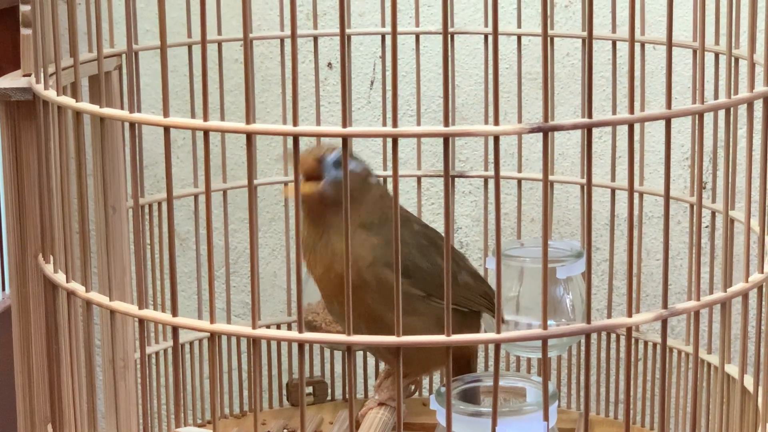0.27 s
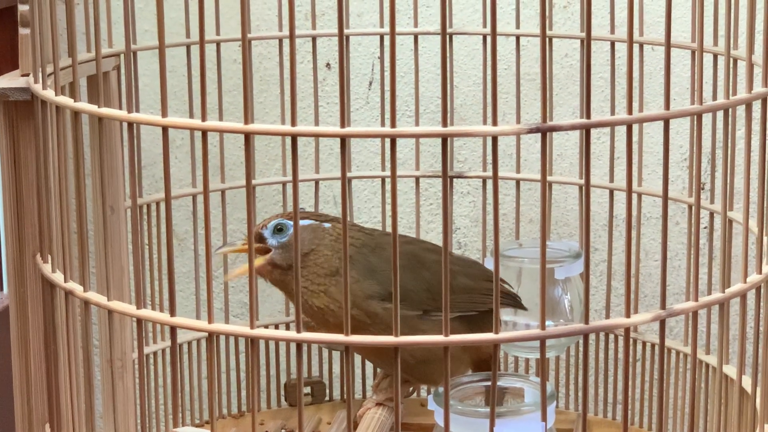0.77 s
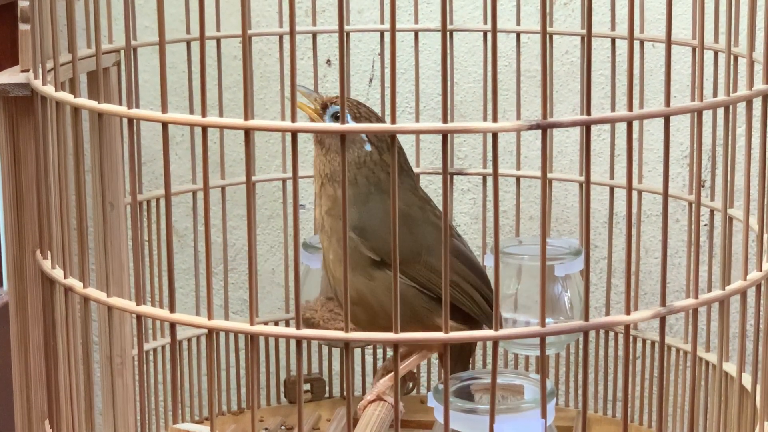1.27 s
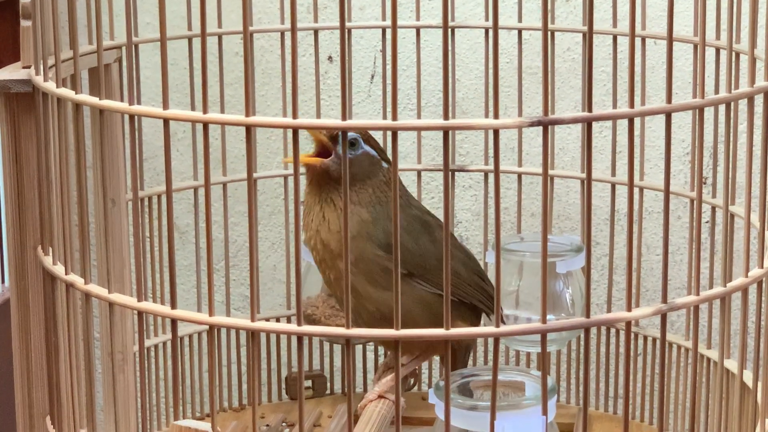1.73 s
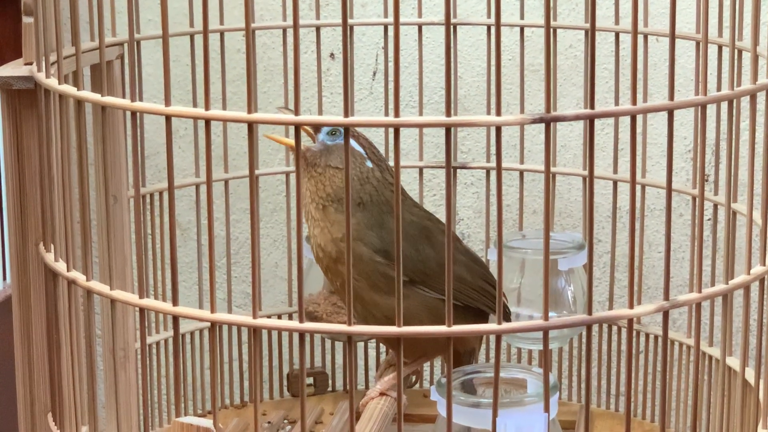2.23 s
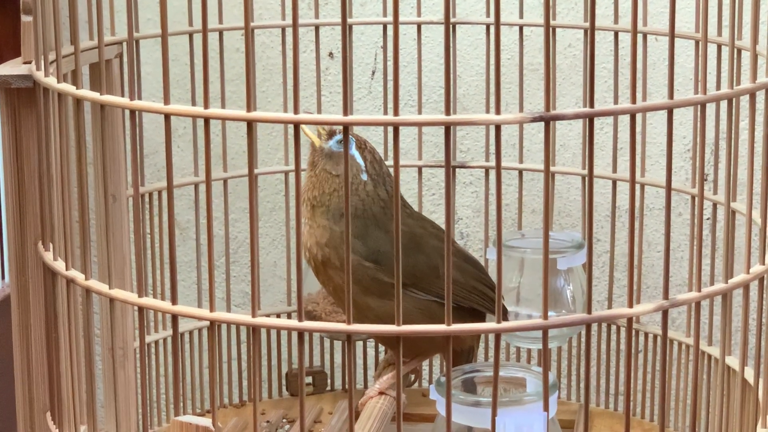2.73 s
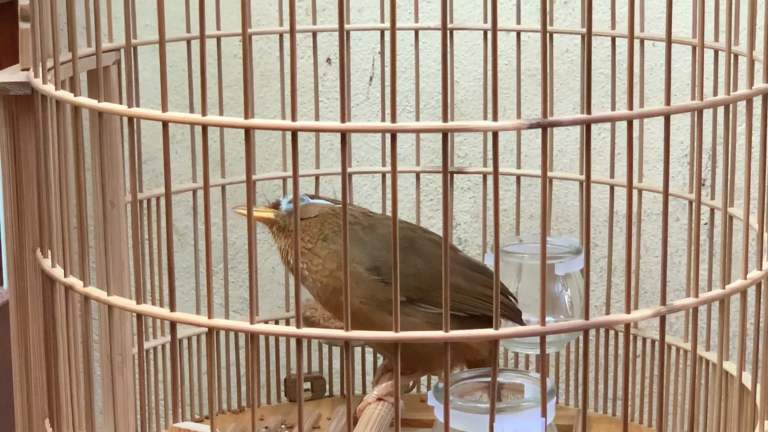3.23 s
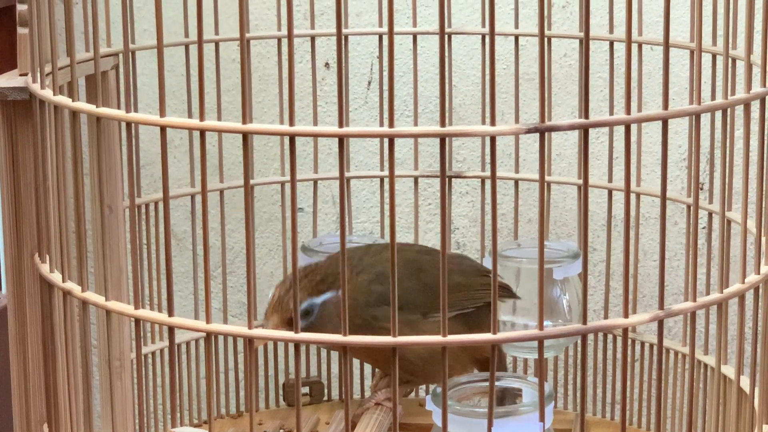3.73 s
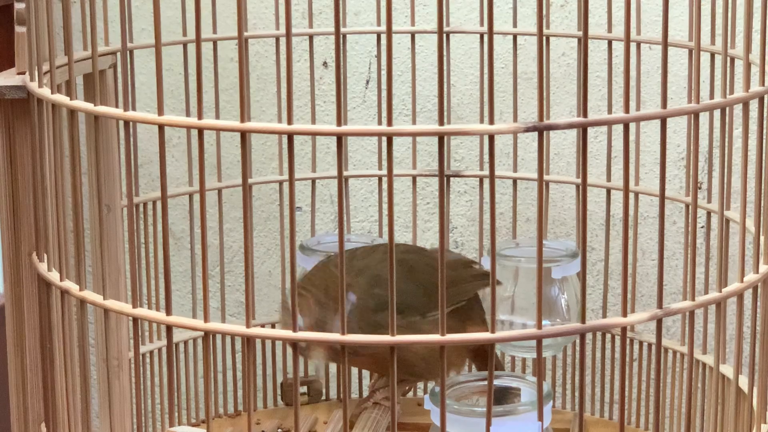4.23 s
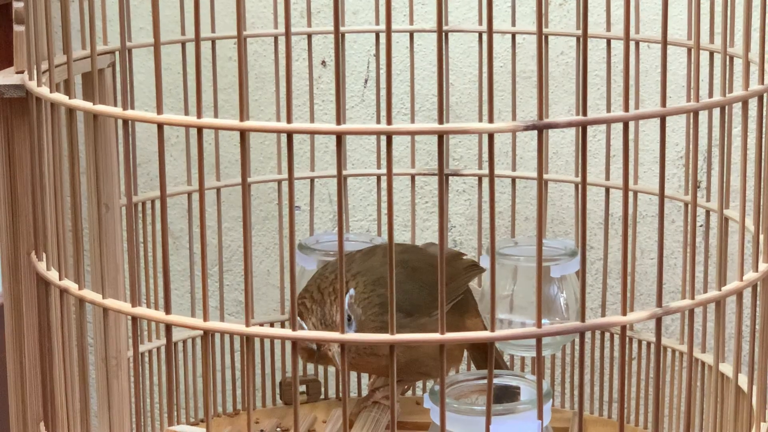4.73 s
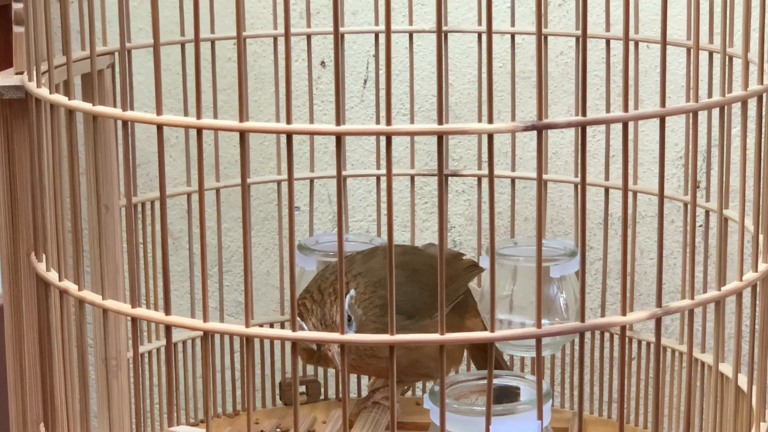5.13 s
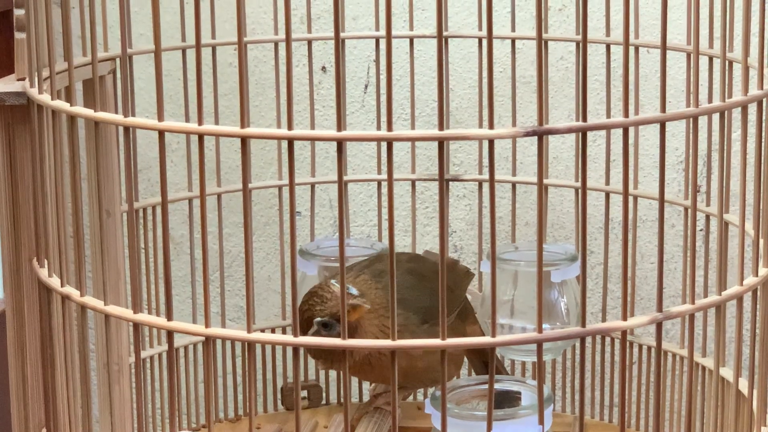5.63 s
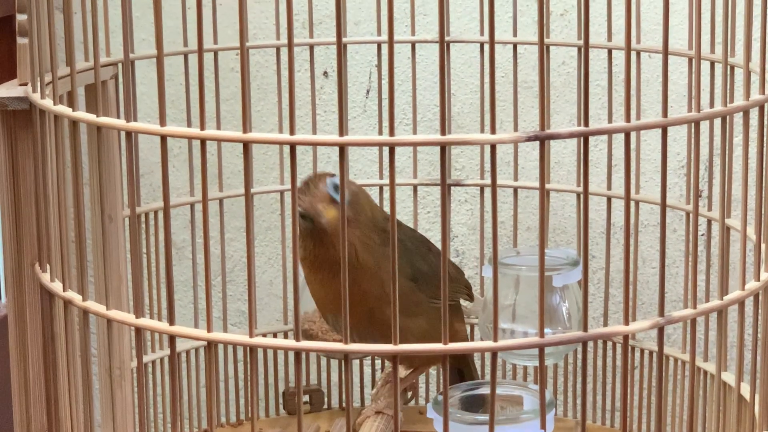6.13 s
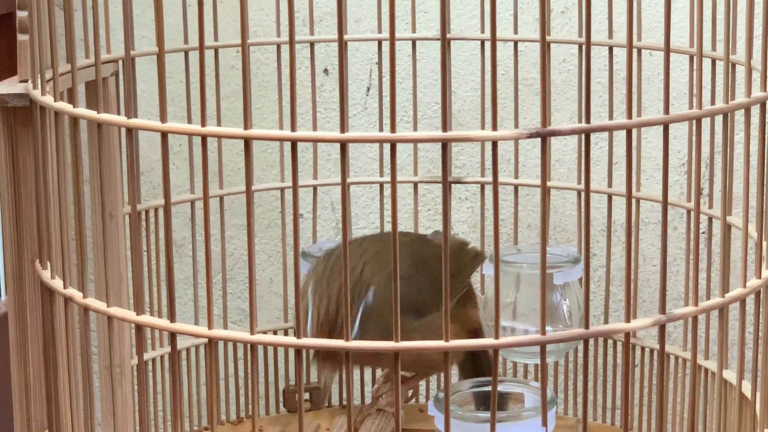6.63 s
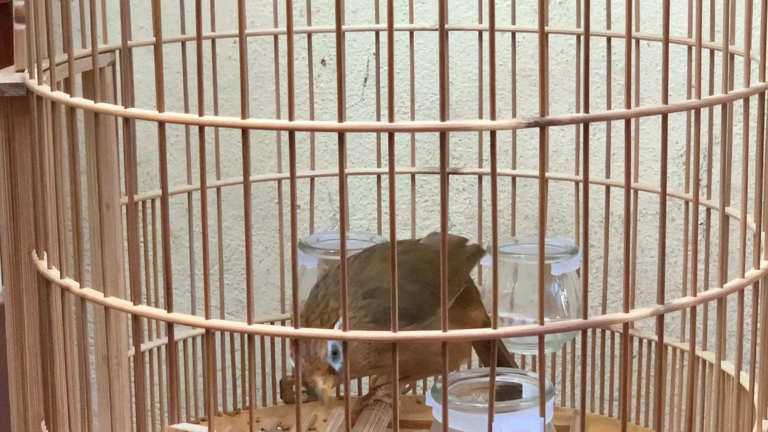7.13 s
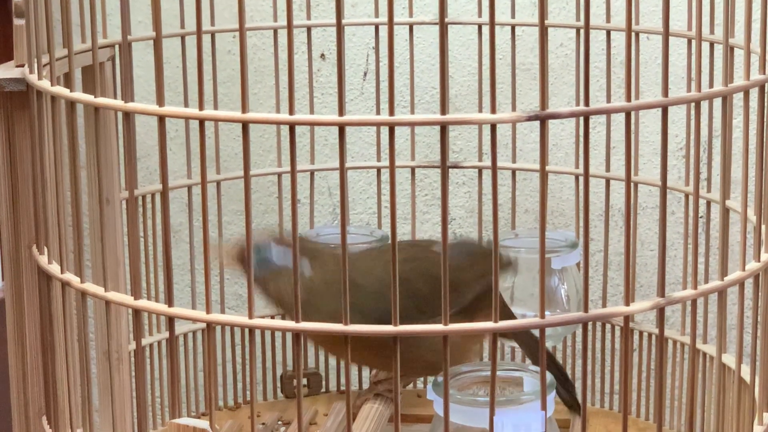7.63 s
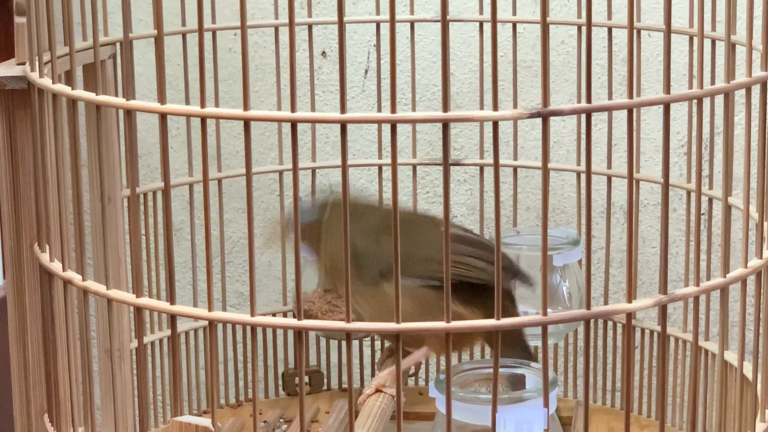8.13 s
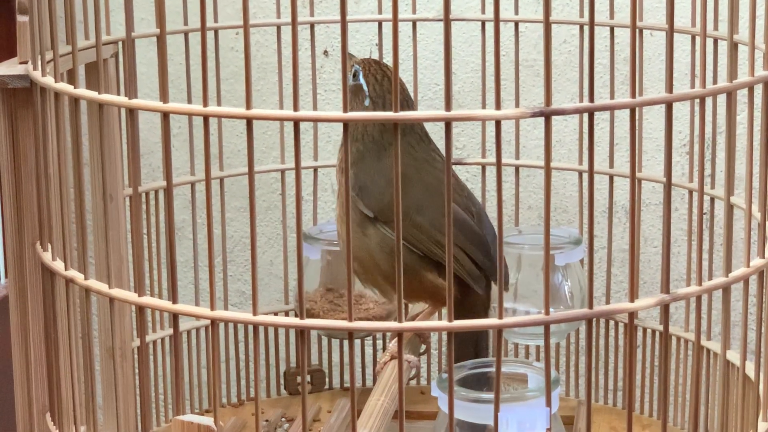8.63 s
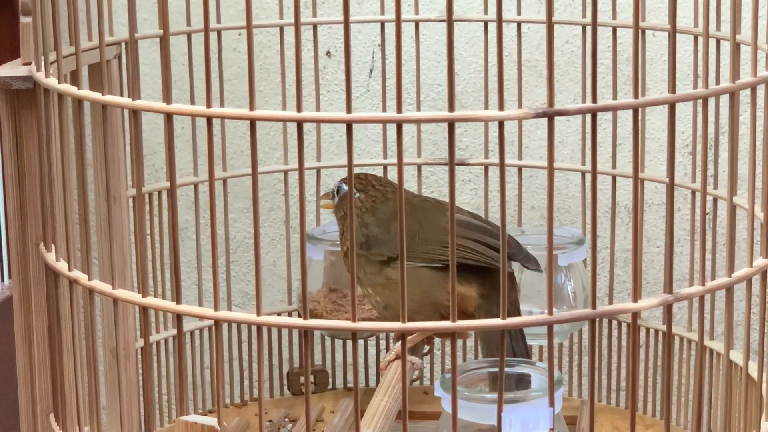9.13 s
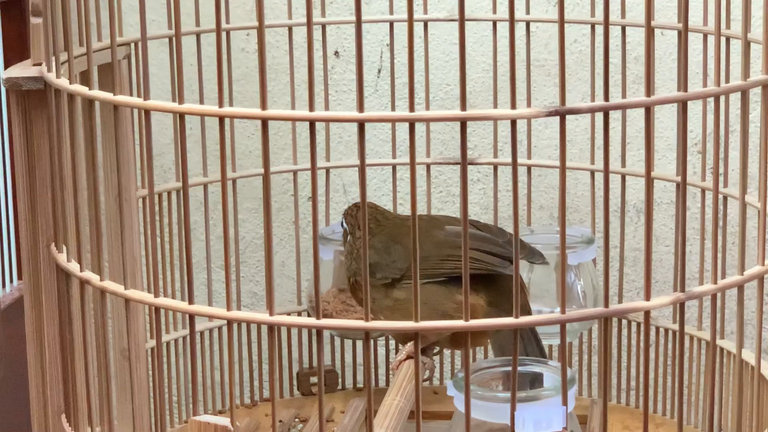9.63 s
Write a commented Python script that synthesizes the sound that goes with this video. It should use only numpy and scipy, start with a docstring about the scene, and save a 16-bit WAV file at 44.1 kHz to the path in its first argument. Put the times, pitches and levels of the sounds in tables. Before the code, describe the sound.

Loud, bright whistled notes leap between low and high pitches near the microphone, then stop. Faint, hoarse and gliding calls fill the gap before a mellow, lower bird swells upward and repeats brisk downward notes from the right. After a quiet lull, the near bird churrs gently while its bamboo cage clicks and knocks. Distant rasps close the scene, with steady low humming, soft hiss and short room reverberation beneath.

```python
"""A caged songbird whistles a phrase close by and later churrs: near sines, burred by a fluttering membrane.
A deeper-voiced bird, louder on the right, answers with one rising call and a run of falling notes.
Further off, gliding sines and pulse trains make whistles, chips and rasps; randomly wandering carriers make
hoarse calls and a faint insect-like hiss; noise pulses rattle late on. Now and then a blow rings the bamboo.
Behind lie a blurred chorus of random glides, a bright hiss in puffs and a hum of wandering tones with rumble."""
import sys
import numpy as np
from scipy import signal
from scipy.fft import rfft, irfft, next_fast_len
from scipy.io import wavfile
from scipy.ndimage import uniform_filter1d

SR = 44100
rng = np.random.default_rng(int(sys.argv[2]) if len(sys.argv) > 2 else 0)


def dump_mix(stems):
    """Bounce the given channels to the path in sys.argv[1] as a 16-bit WAV at rate SR."""
    frames = np.atleast_2d(stems).T  # one column per channel
    limited = np.clip(frames, -1, 1)  # hard clip at full scale
    pcm = np.round(limited * 32767).astype(np.int16)
    wavfile.write(sys.argv[1], SR, pcm)


N = 436149

# Whistled notes glide once between pitches; haste > 0 glides early and settles, < 0 holds and glides late.
# near bird's song: (start [s], length [s], from [Hz], to [Hz], haste, peak [dB], place of the peak [0-1],
# swell [dB], burr [0-1])
SONG_NOTES = [(0.116, 0.1079, 2581, 1935, 2.36, -19.5, 0.32, 5, 0.82),
              (0.228, .03, 2093, 2998, 2.11, -15, 0.89, 11, 1),
              (0.316, 0.0256, 3794, 3783, -0.27, -9.5, 0.7, 6.5, 0.4),
              (0.344, 0.0441, 3483, 2768, 0.83, -18, 0.47, 2, 0.81),
              (0.394, 0.0823, 2403, 2031, 1.46, -22, 0.67, 2, 0.85),
              (0.625, .055, 1990, 2150, .8, -29, .4, 4, .5),
              (0.695, 0.04, 2230, 2260, 1.1, -19.5, 0.45, 5, 0.5),
              (.745, .035, 2250, 2100, -.5, -28, .2, 4, .6),
              (0.791, 0.1087, 1933, 3039, 2.08, -17, 0.86, 11, 0.52),
              (0.98, 0.118, 4480, 3140, 2.3, -14.5, .86, 11, 0.49),
              (1.153, 0.025, 4150, 4600, 1.3, -24.5, 0.52, 4, 0.5),
              (1.193, 0.043, 3868, 3919, .8, -10.5, 0.5, 12, 0.16),
              (1.301, 0.0884, 2069, 2297, 0.37, -19, 0.84, 15, 0.17),
              (1.421, 0.0276, 2333, 2270, 0.86, -19, 0.49, 14, 0.51),
              (1.49, .048, 1930, 2700, 0.3, -23.5, 0.5, 5.5, 0.66),
              (1.548, 0.078, 2900, 3035, 1.2, -14.5, 0.4, 3, 0.12),
              (1.715, 0.026, 4240, 4473, 1.06, -28, 0.31, 2.5, 0.6),
              (1.742, 0.055, 3750, 3690, .8, -22, .85, 4, 0.38),
              (1.812, .03, 3870, 3950, 1.2, -19, .3, 5, .4),
              (1.917, .175, 1918, 2229, 2.01, -20.5, 0.88, 6, 0.25),
              (2.184, 0.075, 1920, 2720, .7, -23, 0.8, 5, 0.45),
              (2.268, .1, 2760, 3000, -.8, -20, .8, 4, .45),
              (2.437, 0.05, 3600, 3760, 2.2, -26, .6, 5, 0.4),
              (2.507, .04, 3790, 3870, 1.5, -17.5, .25, 6, .4),
              (2.67, 0.045, 1920, 2160, 1.5, -28, .6, 3, 0.47),
              (2.73, .125, 2150, 2290, -1.6, -22, .55, 4, .35),
              (2.864, 0.028, 2450, 3420, -.6, -19, 0.61, 10.5, 0.86)]
# near bird's churrs: (start [s], length [s], top [Hz], end [Hz], peak [dB])
CHURR_NOTES = [(8.363, 0.172, 2270, 2285, -23), (8.679, 0.165, 2300, 2275, -22.5),
               (9.023, 0.162, 2235, 2195, -23), (9.332, 0.085, 2335, 2250, -24)]
# near bird in stereo: (frequency [Hz], left over right [dB], left lead [rad])
NEAR_STEREO = [(1915, -0.5, 0.42), (2280, -3.5, 0.897), (2935, -2.5, 1.09), (3738, -1, 1.926),
               (4436, -1.5, 1.7), (6480, -1, 2.488), (8125, -1.7, 1.156), (9000, -4, 2.04),
               (10560, 0.5, 2.0), (14000, -1.5, 1.38)]
# near bird's overtones, with faint lines between the whole multiples: (multiple, level [dB])
SONG_OVERTONES = [(2, -25.5), (3, -29), (3.5, -40), (4, -37), (6, -38), (6.5, -38)]
# beak colour on the overtones: (frequency [Hz], gain [dB])
BEAK_COLOUR = [(4000, -3), (6000, -2), (8000, 1), (11000, 3), (12200, -3), (13500, 3), (14500, 1),
               (16000, 5)]
# spectrum of the air through the near bird's beak: (frequency [Hz], density [dB per Hz])
BREATH_SPECTRUM = [(4400, -20), (6000, -12), (8000, -8), (10500, -5), (11900, -16), (13500, 0), (14600, -8),
                   (15800, -14)]
# deep-voiced bird: (start [s], length [s], from [Hz], to [Hz], haste, peak [dB], place of the peak [0-1])
ANSWER_NOTES = [(4.571, 0.5133, 1590, 1951, -1.9, -25.5, .94),
                (5.224, 0.0503, 1623, 1385, 1.09, -14.5, 0.29), (5.382, 0.0503, 1527, 1214, 1.06, -9, 0.37),
                (5.532, 0.0477, 1400, 1095, 0.94, -14, 0.29), (5.683, 0.0398, 1372, 1058, 0.89, -12, 0.38),
                (5.832, 0.0259, 1319, 1048, 0.44, -17, 0.68), (5.98, 0.0368, 1404, 1044, 0.53, -13, 0.42),
                (6.148, 0.0293, 1302, 995, 0.52, -21.5, 0.48), (6.308, 0.0323, 1295, 995.4, 0.57, -18, 0.5),
                (6.474, 0.0395, 1401, 1038, -0.16, -15, 0.59), (6.658, 0.024, 1316, 1040, -0.28, -19, .4),
                (6.803, 0.0737, 1392, 1025, -1.035, -13, 0.63), (7.027, .05, 1273, 980.3, 1.13, -18, 0.25),
                (7.22, 0.101, 1283, 1022, 1.67, -17, 0.31), (7.487, 0.325, 1275, 975, 1.9, -17.5, 0.14)]
# whistles further off: (start [s], length [s], from [Hz], to [Hz], haste, peak [dB], place of the peak [0-1])
FAR_NOTES = [(.02, 0.098, 2520, 2557, 0.13, -34, 0.86), (0.151, 0.117, 3436, 2777, 1.5, -33.5, 0.34),
             (0.541, 0.1284, 2954, 3096, 1.27, -34.5, 0.6), (.74, 0.083, 2837, 2927, 0.56, -32, 0.123),
             (.93, 0.062, 2346, 2370, 1.53, -30.5, .5), (1.02, 0.2025, 2024, 2244, -0.89, -37, 0.69),
             (1.23, 0.142, 3660, 3183, 2.23, -35, 0.253), (1.41, 0.11, 2840, 2790, .8, -32, 0.4),
             (1.55, .13, 2600, 2720, .8, -37, .6), (1.705, .05, 2090, 2240, 1.8, -36, .6),
             (1.72, .15, 2760, 2650, .6, -39, .5), (2.44, 0.06, 2950, 2178, -1.5, -39, 0.3),
             (2.905, .08, 2600, 2700, 1.5, -38, .8), (2.62, 0.183, 2468, 2369, 1.09, -32.5, 0.44),
             (3.0, .1, 2670, 2670, .5, -39, .3), (3.125, .03, 1820, 1820, .5, -45, .4),
             (3.275, 0.1415, 2345, 2390, -1.2, -28.5, 0.4), (3.42, 0.0299, 2450, 2905, 1, -39, .4),
             (3.5, .07, 3650, 2710, 2.6, -46, .8), (3.575, .085, 2690, 2650, .6, -30, .3),
             (3.7, .04, 2650, 2640, .6, -44, .3), (3.72, .03, 3510, 3500, .6, -40, .4),
             (3.96, 0.142, 1895, 2132, 0.2, -45, 0.81), (4.11, 0.172, 2147, 1752, -0.93, -43, 0.68),
             (4.07, .1, 2980, 2930, .6, -46, .15), (4.33, 0.14, 1790, 2200, -1.3, -45, .8),
             (4.46, .05, 2120, 2350, 1.2, -36, .75), (4.705, .1, 3130, 2520, 1.9, -41, .35),
             (4.82, .1, 2460, 1850, -.9, -36, .28), (5.06, .14, 1511, 1624, 1.84, -38.5, 0.574),
             (5.77, 0.0504, 1900, 1906, 0.12, -45.5, 0.44), (5.88, .05, 1906, 1898, -1.1, -44.5, 0.47),
             (5.99, 0.043, 1940, 1979, -1.5, -41.5, .4), (5.17, 0.24, 2100, 2130, 2.73, -39.5, 0.48),
             (5.34, .085, 3280, 2520, 1.3, -39, .4), (5.44, .07, 2450, 2200, .5, -40, .4),
             (5.53, .07, 2050, 1850, 1.5, -49, .4), (5.671, 0.089, 2792, 3250, 1.3, -41.5, 0.182),
             (5.885, 0.3, 4400, 2998, 2.5, -41, 0.71), (6.19, 0.1164, 2835, 3244, 0.05, -35.5, 0.51),
             (6.56, .21, 3550, 2980, 1.5, -40.5, .5), (6.954, 0.149, 3171, 3230, 0.8, -34.5, 0.094),
             (7.68, 0.057, 2016, 1895, 0.53, -47, 0.237), (7.786, 0.058, 1986, 1890, 0.9, -42.5, .2),
             (7.875, 0.035, 2036, 2000, 0.6, -44, .4), (7.93, .03, 2230, 2130, .8, -45, .6),
             (7.98, .04, 2250, 2150, .8, -47, .3), (8.03, .045, 1180, 1140, .6, -49, .6),
             (8.04, .035, 4600, 4560, .6, -55, .4), (8.06, .04, 2250, 2300, .6, -52, .5),
             (8.285, .025, 3060, 3040, .6, -50, .5), (7.43, .04, 1420, 1350, .6, -46, .7),
             (6.98, .03, 1400, 1380, .6, -40, .5), (6.7, .02, 5400, 4900, .8, -48, .4),
             (6.72, .11, 4750, 4620, 2.2, -52, .3), (6.95, .07, 4400, 4580, 1.5, -47, .3),
             (.075, .02, 9000, 6000, 1.2, -48, .5), (8.367, .02, 7500, 3700, 1.5, -53, .5),
             (8.508, .025, 7000, 3300, 1.5, -53, .5), (1.99, .012, 6200, 4700, .8, -54, .6),
             (2.09, .012, 6200, 4700, .8, -54, .6), (2.19, .012, 6200, 4700, .8, -54, .6),
             (2.29, .012, 6200, 4700, .8, -54, .6), (2.393, .012, 6200, 4700, .8, -56, .6),
             (8.14, 0.049, 2120, 2064, 0.44, -47.5, 0.38), (8.27, 0.058, 2098, 2030, 0.24, -50, 0.36)]
# harsh calls further off, with a fast burr:
# (start [s], length [s], from [Hz], to [Hz], haste, peak [dB], place of the peak [0-1])
HARSH_NOTES = [(3.05, .11, 3170, 2350, -2.2, -39, .75), (3.755, .05, 3300, 1850, .6, -39, .3),
               (6.8, .07, 2350, 2680, 2.9, -30, 0.35), (6.78, .07, 2020, 2080, .6, -38, .4),
               (6.875, .05, 2900, 3250, .8, -38, .6), (6.91, .09, 2100, 2750, .9, -38, .5),
               (7.075, .16, 2290, 2130, .6, -33, .4), (7.085, .13, 2620, 2380, 1.2, -36, .15),
               (9.4, .075, 2140, 1880, .5, -28, .2)]
# hoarse calls further off, and a faint insect-like hiss near 8 kHz:
# (start [s], length [s], centre from [Hz], centre to [Hz], level [dB])
WANDERING_CARRIERS = [(0.028, 0.1866, 1245, 1209, -47.5), (.6, 0.2176, 1297, 1257, -45.5),
                      (1.097, 0.165, 1294, 1287, -45), (2.226, 0.192, 1317, 1256, -50.5),
                      (2.95, .12, 4250, 4250, -53), (3.34, .05, 4200, 4150, -54),
                      (3.45, .06, 3950, 3800, -54), (3.62, .07, 3750, 3700, -53),
                      (3.73, .05, 4300, 3900, -53), (3.835, .12, 4150, 4250, -54),
                      (3.97, .12, 4050, 3950, -54), (4.06, .13, 2500, 2450, -50),
                      (4.23, 0.174, 1350, 1280, -44.5), (4.25, .09, 2350, 2300, -47),
                      (4.28, .06, 3950, 3900, -52), (4.375, .09, 4050, 4000, -53),
                      (4.27, .08, 8200, 8200, -66), (4.4, .07, 8200, 8200, -69),
                      (4.5, .06, 8200, 8200, -69), (4.6, .09, 8200, 8200, -68),
                      (4.74, .09, 8300, 8300, -68), (5.05, .28, 8100, 8100, -68),
                      (7.97, .05, 1500, 1400, -52), (7.44, .06, 3250, 3100, -49),
                      (4.473, 0.065, 4000, 4100, -49.5), (4.588, 0.084, 4400, 4420, -49),
                      (4.722, 0.0903, 4090, 4198, -44.5), (5.05, 0.0934, 4110, 3392, -47.5),
                      (5.1, 0.0965, 2636, 2237, -43), (6.147, 0.107, 4240, 3070, -44),
                      (6.497, 0.0894, 2510, 2647, -42.5), (6.735, 0.129, 1673, 2466, -42.5),
                      (6.41, .16, 4200, 3650, -44), (7.02, 0.1785, 4810, 3590, -48),
                      (6.97, .05, 4700, 5050, -50), (7.244, 0.1384, 3460, 3556, -50),
                      (9.439, 0.15, 2678, 3312, -43), (9.68, 0.246, 3194, 3055, -39)]
# thin chips of a small bird: (start [s], peak [dB], pitch just past the middle [Hz])
CHIP_CALLS = [(1.7909, -30, 4030), (1.8932, -54, 4580), (1.9983, -52, 4550), (2.0992, -53, 4606),
              (2.2, -54.5, 4504), (2.2969, -45.5, 4575), (2.4013, -50, 4590), (7.6815, -51.5, 4080),
              (7.785, -53, 4040), (7.798, -51, 6630), (7.869, -52, 4086), (7.925, -53, 4450),
              (8.2718, -46, 6600), (8.16, -55, 4300)]
# rasping calls with a moving throat resonance:
# (start [s], length [s], resonance from [Hz], resonance to [Hz], width [Hz], level [dB])
RASP_CALLS = [(9.4, .24, 4150, 3250, 280, -43), (9.43, .21, 2300, 3050, 330, -36),
              (9.68, .24, 3400, 2950, 310, -30.5), (9.63, .26, 1800, 2350, 240, -44)]
# two-voiced twitters of a small bird: (time [s], peak [dB])
TWITTER_CALLS = [(5.622, -49), (5.738, -46), (5.852, -47), (5.969, -46)]
# the twitter's two voices, a flick up and an arch: (time after the call [s], pitch [Hz], level [dB])
VOICES = [
    [(-.004, 5200, -16), (.008, 5680, -1), (.017, 5950, -10)],
    [(.006, 4300, -10), (.02, 4580, -1), (.032, 4620, 0), (.04, 4350, -8), (.052, 3650, -13)],
]
# resonances of the late rattle: (frequency [Hz], width [Hz], level [dB])
RATTLE_RESONANCES = [(3100, 300, -6), (5300, 350, 0), (6250, 350, -2), (7100, 400, 0), (8600, 900, -8),
                     (10500, 1200, -8)]
# blows on the bamboo: (time [s], body level [dB], tick level [dB])
KNOCK_BLOWS = [(3.309, -54, -40), (3.714, -77, -46.5), (4.007, -60, -46), (5.418, -34, -74.5),
               (6.424, -36, -45), (8.933, -19.5, -30), (9.369, -27.5, -27.5)]
# ringing modes of the bamboo: (frequency [Hz], level [dB], decay by 60 dB [s])
BAMBOO_MODES = [(1192.5, 3.5, 0.024), (800, -44.5, .02), (1750, -26.5, 0.0061)]
# background levels: (time [s], chorus [dB], chatter hiss [dB])
BED_LEVELS = [(0.0, -32, -52), (0.47, -37.5, -61), (0.82, -51.5, -69), (1.1, -37, -57), (1.54, -46, -69.5),
              (1.82, -38.5, -71), (2.23, -51, -67.5), (2.75, -39.5, -59.5), (3.14, -49, -71),
              (3.92, -50, -66), (4.3, -43, -64), (4.74, -50, -67), (7.05, -43, -65), (7.35, -51, -74),
              (7.7, -56, -74), (8.62, -53, -70), (8.78, -50, -59), (9.65, -42, -60), (9.89, -31, -51)]
# colour of the distant chorus: (frequency [Hz], density [dB per Hz])
CHORUS_SPECTRUM = [(880, -17.5), (1500, -17.5), (1700, -9), (2190, -2), (2860, -4.5), (3120, -10),
                   (5200, -14.5), (6760, -54), (11400, -120)]
# colour of the bright hiss: (frequency [Hz], density [dB per Hz])
CHATTER_SPECTRUM = [(2650, -34.5), (4500, -9), (5610, -7), (6890, -5), (9060, -7), (10500, -3),
                    (11800, -16), (12500, -11), (13900, -6), (15800, -24)]
# puffs of bright hiss, as of feathers or far chatter: (start [s], decay [s], level [dB])
HISS_PUFFS = [(3.3, .05, -59), (3.44, .05, -63), (3.62, .05, -61), (3.73, .04, -60), (3.84, .08, -60),
              (4.0, .05, -62), (4.27, .07, -56), (4.38, .05, -60), (4.49, .04, -61), (4.59, .07, -60),
              (4.74, .06, -60), (4.88, .05, -60), (5.16, .06, -56), (5.37, .05, -64), (5.51, .05, -59),
              (6.15, .04, -54), (6.36, .08, -55), (6.74, .12, -57), (6.96, .1, -60), (7.1, .1, -58),
              (7.57, .04, -61), (7.975, .04, -54), (8.37, .1, -60), (8.72, .12, -54), (9.4, .15, -56),
              (9.7, .2, -47)]
# hum level over time: (time [s], level [dB])
HUM_FADER = [(0.0, -39.5), (0.36, -37.5), (1.43, -39.5), (1.95, -46), (2.069, -40), (9.81, -36.5),
             (9.89, -35.5)]
# tones of the hum: (frequency [Hz], spread of the wander [Hz], level [dB])
HUM_TONES = [(47.7, 4.5, -11), (84.937, 4.51, 0.5), (114.65, 9.5, -7.5), (153.65, 4, -12.5),
             (260.4, 4, -30.5)]
# the room's rumble: (frequency [Hz], density [dB per Hz])
RUMBLE_SPECTRUM = [(15, -36.5), (25, -16), (86, -2.5), (97, -8.5), (114, -21.5), (134, -24.5), (162, -17.5),
                   (291, -26.5), (679, -30), (768, -33), (1130, -35), (1260, -34.5), (1700, -33),
                   (2210, -57.5), (3740, -120)]
# stereo width of the noise beds: (frequency [Hz], left-right likeness, held to -1..1)
STEREO_LIKENESS = [(60, 0.84), (130, 0.7), (290, 0.6), (640, 0.16), (1410, -0.091), (3100, -1.046),
                   (6820, 0.37), (15000, -0.84)]

# note shapes: attack [s], release [s], fall after the peak as a share of the swell, drop at the edges [dB]
SONG_SHAPE = .012, .02, .8, 15
ANSWER_SHAPE = .024, .027, 1.3, 28
FAR_SHAPE = .012, .015, 1.1, 12
PEAK_BURR = 0.52   # share of the burr left where a note is loudest
CHURR_FROM_HZ, CHURR_DIP_HZ, CHURR_BURR = 2000, 60, 0.45
CHURR_RISE_S, CHURR_RELEASE_S, CHURR_SWELL_DB, CHURR_EDGE_DB = 0.048, 0.03, 2, 15.5
ANSWER_BURR, ANSWER_SWELL_DB, ANSWER_SWELL_DB_PER_S = 0.1, 5.5, 19.5   # longer calls swell more
FAR_SWELL_DB, FAR_BURR, FAR_FLICKER_DB = 9.5, 0.24, 3.5
HARSH_SWELL_DB, HARSH_BURR = 5.6, .65
OVERTONE_GROWTH, FULL_VOICE_DB = .65, -18   # extra dB the overtones sink per dB below full voice
OVERTONE_FUZZ = .45   # depth of the breathy roughness on the overtones
CARRIER_WIDTH_HZ = 201.6   # how fast the carriers wander
RASP_RATE_HZ, RASP_SAG_HZ, RASP_JITTER, RASP_FLICKER_DB = 226, 11, .008, 4.5
RATTLE_PER_S, RATTLE_PEAK_S, RATTLE_SPAN_S = 14.2, 9.02, (8.635, 9.69)   # rate, time of one pulse, start and end
RATTLE_DB, RATTLE_HALF_DEPTH_DB = -48, 9
PUFF_ATTACK_S = .012
ROOM_T60_S, WALL_CUT_HZ = 0.2799, 21000
CUTOFF_HZ = 16100


def song():
    """The near bird's whistled phrase: single glides with a burr and bright overtones."""
    notes = [note(SONG_SHAPE, *row) for row in SONG_NOTES]
    return whistle(notes, burr_hz=74.0, waver=0.18, stereo=np.transpose(NEAR_STEREO), harmonics=SONG_OVERTONES)


def churr():
    """The near bird's churrs: a fast burr that bends the pitch more than in the song."""
    return whistle([churr_note(*row) for row in CHURR_NOTES], burr_hz=238, waver=0.075, bend=.035, grit=.8,
                   stereo=[[1], [-2.2], [.9]], harmonics=[(2, -30), (3, -39), (6, -45)])


def breath(bird):
    """Air rushing through the near bird's beak: noise that follows the loudness of its voice."""
    effort = uniform_filter1d(np.abs(bird).mean(axis=0), size=400)
    return amp(-33.5) * effort * banded_noise(BREATH_SPECTRUM, patchy_db=3.0)


def note(shape, s, length, from_hz, to_hz, haste, peak_db, place, swell_db, burr):
    """One glide swelling to its peak, where it is cleanest, as rows (time [s], pitch [Hz], level [dB], burr)."""
    attack, release, fall, edge_db = shape
    place = np.clip(place, .05, .95)
    u = np.union1d(np.linspace(0, 1, num=12), place)   # progress through the note, 0-1
    if haste > 0:
        done = np.tanh(haste * u) / np.tanh(haste)
    else:
        done = 1 - np.tanh(haste * (1 - u)) / np.tanh(haste)
    level_db = peak_db - swell_db * np.interp(u, [0, place, 1], [1, 0, fall])
    rough = burr * np.interp(u, [0, place, 1], [1, PEAK_BURR, 1])
    body = np.transpose([s + length * u, from_hz + (to_hz - from_hz) * done, level_db, rough])
    return [body[0] - [attack, 0, edge_db, 0], *body, body[-1] + [release, 0, -edge_db, 0]]


def churr_note(s, length, top_hz, end_hz, peak_db):
    """A quick rise in pitch and level, a pitch dip in the middle while it swells, then a fade."""
    middle_s, middle_hz = (CHURR_RISE_S + length) / 2, (top_hz + end_hz) / 2 - CHURR_DIP_HZ
    rows = [(0, CHURR_FROM_HZ, -CHURR_EDGE_DB),
            (CHURR_RISE_S, top_hz, -CHURR_SWELL_DB),
            (middle_s, middle_hz, -CHURR_SWELL_DB),
            (length, end_hz, 0),
            (length + CHURR_RELEASE_S, end_hz, -2 * CHURR_EDGE_DB)]
    return [(s + after, hz, peak_db + db, CHURR_BURR) for after, hz, db in rows]


def whistle(notes, burr_hz, waver, stereo, harmonics=(), bend=.012, grit=1):
    """Near sines from rows (s, Hz, dB, burr); a fluttering membrane beats their level and pitch."""
    out, t = np.zeros((2, N)), np.arange(N) / SR
    flutter = np.cos(2 * np.pi * np.cumsum(burr_hz * (1 + waver * drift(30.6))) / SR)
    rasp, fuzz = drift(130), drift(260)
    for rows in notes:
        s, *columns = np.transpose(rows)
        at = slice(int(s[0] * SR), int(s[-1] * SR))
        hz, level_db, burr = (np.interp(t[at], s, c) for c in columns)
        burr = np.clip(burr, 0, 1)
        beat = 1 + burr * (flutter[at] + 0.366 * grit * rasp[at])
        pitch_burr = burr * (bend * flutter[at] + 0.04 * grit * rasp[at])
        phase = 2 * np.pi * np.cumsum(hz * (1 + pitch_burr)) / SR
        fade = np.clip(np.minimum(t[at] - s[0], s[-1] - t[at]) / 0.0054, 0, 1)
        for side, sign in enumerate((1, -1)):
            for k, db in [(1, 0), *harmonics]:
                # left and right differ in level and phase by frequency
                lean_db, lead = (sign * np.interp(k * hz, stereo[0], c) / 2 for c in stereo[1:])
                wave = np.sin(k * phase + lead) * (k * hz < CUTOFF_HZ)
                if k > 1:
                    restraint_db = OVERTONE_GROWTH * np.minimum(level_db - FULL_VOICE_DB, 0)
                    roughness = 1 + OVERTONE_FUZZ * np.roll(fuzz, int(k * 999))[at]
                    wave = wave * roughness * amp(at_hz(BEAK_COLOUR, k * hz) + restraint_db)
                out[side, at] += np.sqrt(2) * amp(level_db + db + lean_db) * fade * beat * wave
    return out


def answer():
    """The deep-voiced bird: lightly burred glides with a faint octave."""
    notes = []
    for row in ANSWER_NOTES:
        swell_db = ANSWER_SWELL_DB + ANSWER_SWELL_DB_PER_S * row[1]
        notes.append(note(ANSWER_SHAPE, *row, swell_db, ANSWER_BURR))
    return whistle(notes, burr_hz=60.4, waver=0.45, stereo=[[1000, 1900], [-4.5, -3], [.1, .1]],
                   harmonics=[(2, -45)])


def far_whistles():
    """Birds further off: plain burred glides whose level flutters on the way across the room."""
    notes = [note(FAR_SHAPE, *row, FAR_SWELL_DB, FAR_BURR) for row in FAR_NOTES]
    calls = whistle(notes, burr_hz=121.2, waver=0.13, stereo=[[1], [-1.2], [1.2]])
    return calls * amp(FAR_FLICKER_DB * drift(17.8))


def harsh_calls():
    """Harsh calls further off: glides roughened by a deep, fast burr."""
    notes = [note(FAR_SHAPE, *row, HARSH_SWELL_DB, HARSH_BURR) for row in HARSH_NOTES]
    return whistle(notes, burr_hz=192.1, waver=.25, stereo=[[1], [-1.1], [1.1]], harmonics=[(2, -38)])


def wandering_carriers():
    """Hoarse calls and insect-like hiss: carriers of random level and phase, partly apart left and right."""
    out, white = np.zeros((2, N)), rng.standard_normal((3, N))
    r = np.exp(-2 * np.pi * CARRIER_WIDTH_HZ / SR)
    for s, length, from_hz, to_hz, level_db in WANDERING_CARRIERS:
        at = slice(int(s * SR), min(int((s + length) * SR), N))
        shared, left, right = rms_one(signal.lfilter([1], [1, -2 * r, r * r], white[:, at]))
        phase = 2 * np.pi * np.cumsum(np.linspace(from_hz, to_hz, len(shared))) / SR
        swell = np.abs(np.sin(np.linspace(0, np.pi, len(shared)))) ** 0.3
        carrier = shared * np.cos(phase) + np.array([left, right]) * np.sin(phase)
        out[:, at] += amp(level_db) * swell * carrier
    return out


def rasps():
    """A stack of harmonics on a sagging pulse rate; those inside the resonance sound, each flickering."""
    out, jitter, flicker = np.zeros((2, N)), drift(40.0), drift(45.0)
    for s, length, from_hz, to_hz, width_hz, level_db in RASP_CALLS:
        at = slice(int(s * SR), min(int((s + length) * SR), N))
        u = np.linspace(0, 1, at.stop - at.start)
        rate = (RASP_RATE_HZ - RASP_SAG_HZ * u) * (1 + RASP_JITTER * jitter[at])
        phase = 2 * np.pi * np.cumsum(rate) / SR
        centre = from_hz + (to_hz - from_hz) * u
        stack = 0
        for k in range(5, 23):
            throat = np.exp(-((k * rate - centre) / width_hz) ** 2 / 2)
            shimmer = amp(RASP_FLICKER_DB * np.roll(flicker, k * 4999)[at])
            angle = k * phase + k * k   # scattered start phases
            stack = stack + throat * shimmer * np.sin([angle, angle - 1.1])
        fade = np.clip(np.minimum(u, 1 - u) / .15, 0, 1)
        out[:, at] += amp(level_db) * fade * rms_one(stack)
    return out


def chips():
    """Each chip is a short sine that drops in pitch."""
    out, t = np.zeros((2, N)), np.arange(int(0.0227 * SR)) / SR
    for s, peak_db, hz in CHIP_CALLS:
        phase = 2 * np.pi * np.cumsum(hz * (1.05 - 3.9 * t)) / SR
        start = int(s * SR)
        out[:, start:start + len(t)] += amp(peak_db) * np.hanning(len(t)) * np.sin([phase, phase + 0.28])
    return out


def twitters():
    """Both voices of each twitter, as burred near sines."""
    notes = []
    for s, peak_db in TWITTER_CALLS:
        for voice in VOICES:
            notes.append([(s + after, hz, peak_db + db, .5) for after, hz, db in voice])
    return whistle(notes, burr_hz=110.0, waver=.2, stereo=[[1], [0], [.3]])


def rattle():
    """An uneven rattle: pulses of noise in a few fixed resonances."""
    t, white, ring = np.arange(N) / SR, rng.standard_normal((2, N)), 0
    for hz, width_hz, level_db in RATTLE_RESONANCES:
        r = np.exp(-np.pi * width_hz / SR)
        poles = [1, -2 * r * np.cos(2 * np.pi * hz / SR), r * r]
        ring = ring + amp(level_db) * rms_one(signal.lfilter([1, 0, -1], poles, white))
    cycle = np.cos(2 * np.pi * RATTLE_PER_S * (t - RATTLE_PEAK_S)) - 1
    pulses = amp(RATTLE_HALF_DEPTH_DB * cycle + 3.5 * drift(5.0))
    sounding = (t > RATTLE_SPAN_S[0]) & (t < RATTLE_SPAN_S[1])
    return amp(RATTLE_DB) * pulses * sounding * rms_one(ring)


def knocks():
    """A blow rings the bamboo's modes briefly; a bright, dying noise tick rides on its front."""
    s, body_db, tick_db = np.transpose(KNOCK_BLOWS)
    blows, ticks, body = np.zeros(N), np.zeros(N), 0
    start = (s * SR).astype(int)
    blows[start], ticks[start] = amp(body_db), amp(tick_db)
    for hz, level_db, t60 in BAMBOO_MODES:
        r, w = 10 ** (-3 / (t60 * SR)), 2 * np.pi * hz / SR
        strike = [0, amp(level_db) * np.sin(w)]
        # the tiny offset keeps the filter off vanishingly small numbers
        body = body + signal.lfilter(strike, [1, -2 * r * np.cos(w), r * r], blows + 1e-18)
    dying = signal.lfilter([1], [1, -np.exp(-1 / (0.0023 * SR))], ticks + 1e-18)
    band = signal.butter(2, [3000, 13000], "band", fs=SR, output="sos")
    bright = signal.sosfilt(band, rng.standard_normal((2, N)))
    return body + dying * bright


def room(x):
    """Room sound: ten feedback delays a side, duller on every round."""
    size = next_fast_len(N + SR)
    hz = np.arange(size // 2 + 1) * SR / size
    dull = 1 / np.sqrt(1 + (hz / WALL_CUT_HZ) ** 2)
    response = np.zeros((2, len(hz)), complex)
    for k, lag in enumerate(rng.uniform(.008, .04, 20)):
        loop = 10 ** (-3 * lag / ROOM_T60_S) * dull * np.exp(-2j * np.pi * hz * lag)
        response[k % 2] += loop / (1 - loop) * (-1) ** (k // 2)
    return irfft(rfft(x.mean(axis=0), size) * response, size)[:, :N]


def chorus():
    """Many distant birds: short, burry random glides heard only through the room, over their blurred hiss."""
    notes = []
    for start, length, pitch, glide, loud in rng.random((380, 5)):
        s, hz = start * (N / SR - .2), 1750 * 2.6 ** pitch
        end, bend = s + .03 + .08 * length, 1 + .3 * (glide - .6)
        level_db = at_hz(CHORUS_SPECTRUM, hz) - 10 * loud
        notes.append([(s, hz, level_db - 19.5, .7),
                      ((s + end) / 2, hz * np.sqrt(bend), level_db, .7),
                      (end, hz * bend, level_db - 17, .7)])
    glides = room(whistle(notes, burr_hz=96.59, waver=.3, stereo=[[1], [0], [0]]))
    hiss = banded_noise(CHORUS_SPECTRUM, patchy_db=2.5)
    return rms_one(rms_one(glides) + amp(-7) * hiss)


def bright_hiss(chatter_gain):
    """High noise over a wavering floor, with puffs that rise fast and die away."""
    t = np.arange(N) / SR
    throb = amp(1.5 * drift(4.0))
    puffs = np.zeros(N)
    for s, decay, level_db in HISS_PUFFS:
        at = slice(int(s * SR), int(s * SR) + SR // 2)
        age = np.maximum(t[at] - s, 0)
        puffs[at] += amp(level_db) * (1 - np.exp(-age / PUFF_ATTACK_S)) * np.exp(-(age / decay) ** 2)
    return (chatter_gain * throb + puffs) * banded_noise(CHATTER_SPECTRUM, patchy_db=2.5)


def hum():
    """A motor's drone: tones that wander in pitch and waver in level, over the room's rumble."""
    drone = 0
    for hz, wander_hz, level_db in HUM_TONES:
        phase = 2 * np.pi * np.cumsum(hz + wander_hz * drift(3.0)) / SR
        drone = drone + amp(level_db + 2.5 * drift(4.0)) * np.sin(phase)
    rumble = amp(-3.0) * banded_noise(RUMBLE_SPECTRUM, patchy_db=3.0)
    return rms_one(rms_one(drone) + rumble) * amp([[-.9], [.9]])   # a little louder on the right


def banded_noise(spectrum, patchy_db):
    """Quarter-octave bands of stereo noise, each with its own level, flicker timing and likeness; rms 1."""
    octaves = np.log2(spectrum[-1][0] / spectrum[0][0])
    edges = spectrum[0][0] * 2 ** np.arange(0, octaves + 1 / 4, 1 / 4)
    out, white = 0, rng.standard_normal((2, 2, N))
    flicker = amp(patchy_db * drift(13.9))
    for k, (low, high) in enumerate(zip(edges, edges[1:])):
        band = signal.butter(2, [low, high], "band", fs=SR, output="sos")
        mid, side = signal.sosfilt(band, white[k % 2])
        hz = np.sqrt(low * high)
        alike = np.clip(at_hz(STEREO_LIKENESS, hz), -1, 1)
        gain = amp(at_hz(spectrum, hz)) * np.roll(flicker, k * SR // 3)
        out = out + gain * (np.sqrt(1 + alike) * mid + np.sqrt(1 - alike) * side * [[1], [-1]])
    return rms_one(out)


def drift(hz):
    """Noise low-passed at hz, of spread 1; a second of run-in is dropped."""
    r = np.exp(-2 * np.pi * hz / SR)
    return rms_one(signal.lfilter([1], [1, -2 * r, r * r], rng.standard_normal(N + SR))[SR:])


def at_hz(points, hz):
    """Read a spectrum on a log-frequency axis."""
    points = np.array(points)
    return np.interp(np.log(hz), np.log(points[:, 0]), points[:, 1])


def rms_one(x):
    """Scale to rms 1."""
    return x / np.sqrt(np.mean(x ** 2) + 1e-20)


def amp(db):
    """dB to gain."""
    return np.exp(np.asarray(db) * np.log(10) / 20)


def scene():
    """Mix the near bird, the answer, the far sounds, the knocks, their room sound and the backgrounds."""
    t = np.arange(N) / SR
    s, *levels = np.transpose(BED_LEVELS)
    chorus_gain, chatter_gain = (amp(np.interp(t, s, c)) for c in levels)
    hum_gain = amp(np.interp(t, *np.transpose(HUM_FADER)))
    near_song, near_churr, reply, knock = song(), churr(), answer(), knocks()
    far = far_whistles() + harsh_calls() + wandering_carriers() + rasps() + chips() + twitters()
    near_send = amp(-9.5) * near_song + amp(-11.0) * near_churr
    wet = room(near_send + amp(-25.5) * reply + amp(-9) * far + amp(-20) * knock)
    treble = breath(near_song + near_churr) + rattle() + bright_hiss(chatter_gain)
    beds = chorus_gain * chorus() + treble + hum_gain * hum()
    return near_song + near_churr + reply + far + knock + wet + beds


def record(dry):
    """The microphone loses the deepest bass; the top is cut steeply."""
    thin = signal.sosfilt(signal.butter(5, 38, "high", fs=SR, output="sos"), dry)
    return signal.sosfilt(signal.cheby2(20, 70, CUTOFF_HZ, fs=SR, output="sos"), thin)


dry = scene()
out = record(dry)
dump_mix(out)
```